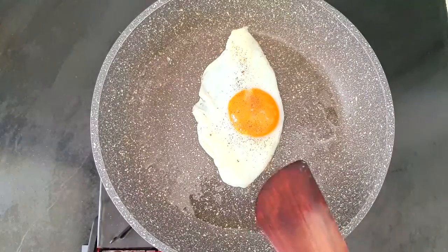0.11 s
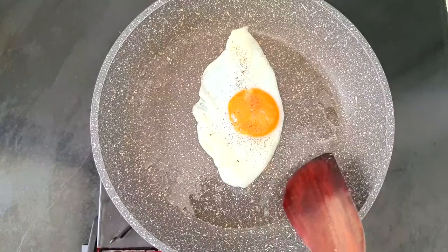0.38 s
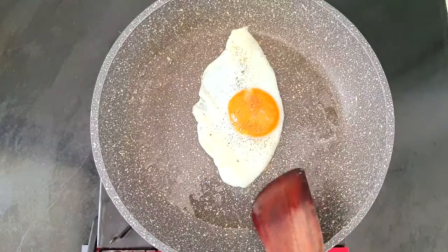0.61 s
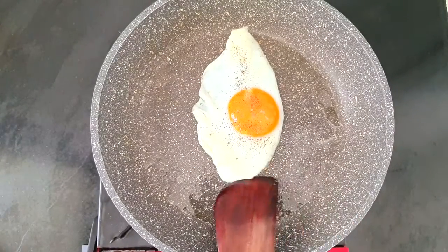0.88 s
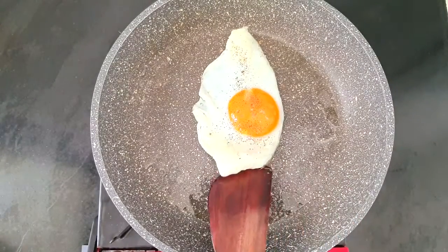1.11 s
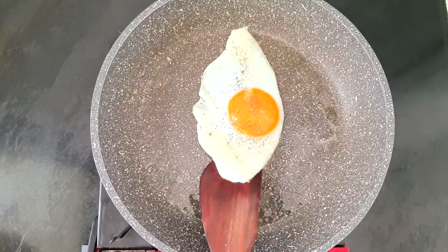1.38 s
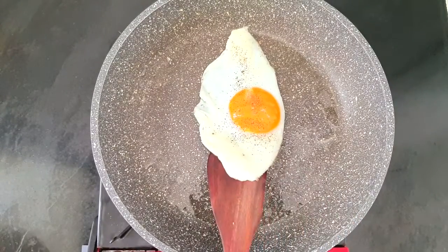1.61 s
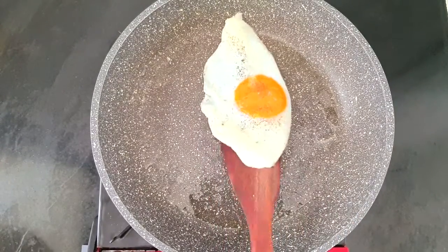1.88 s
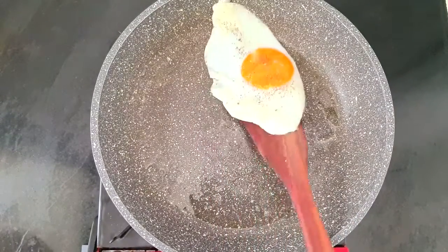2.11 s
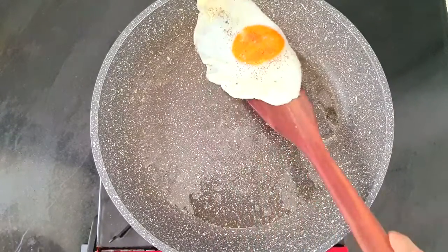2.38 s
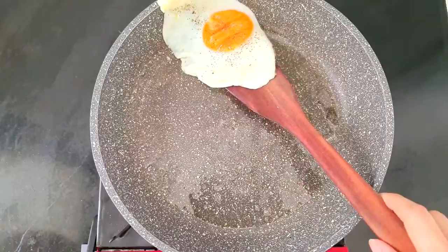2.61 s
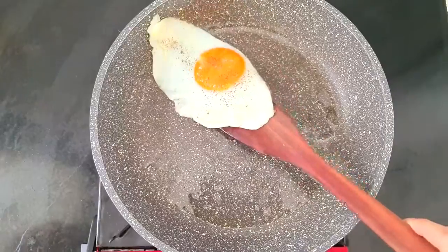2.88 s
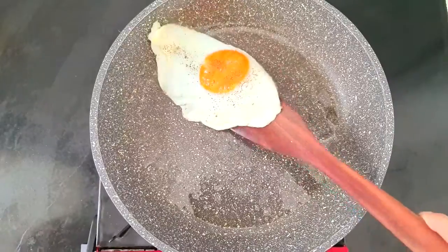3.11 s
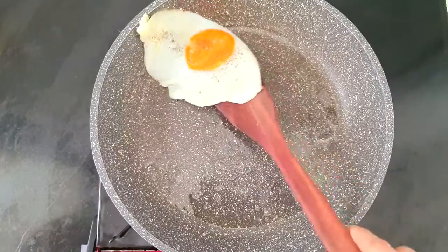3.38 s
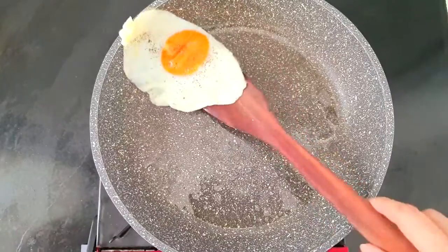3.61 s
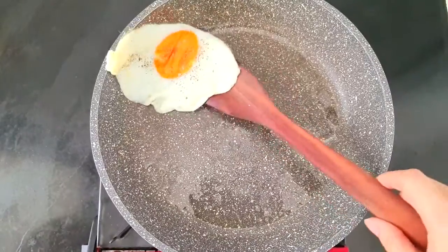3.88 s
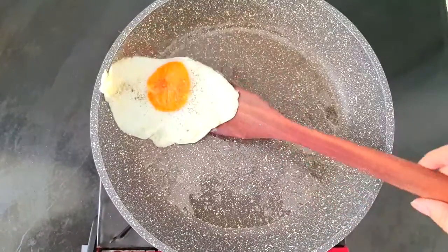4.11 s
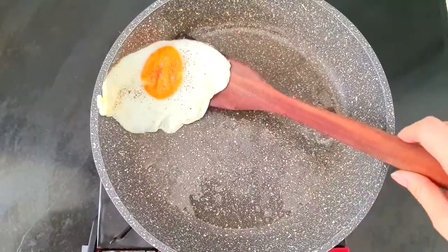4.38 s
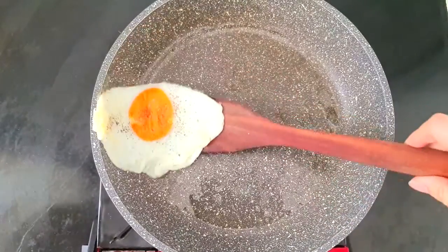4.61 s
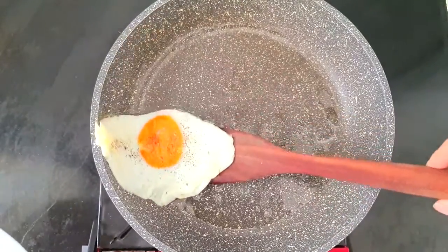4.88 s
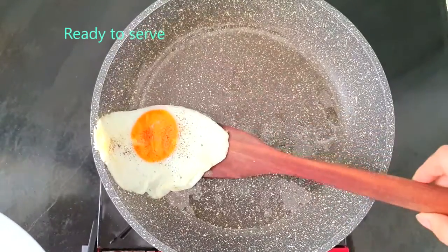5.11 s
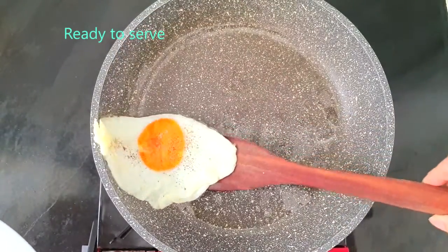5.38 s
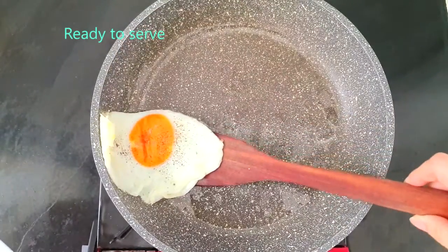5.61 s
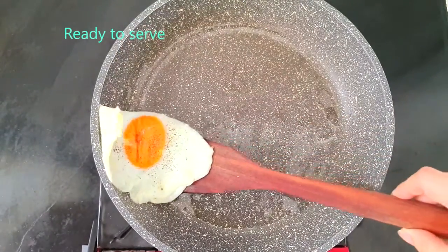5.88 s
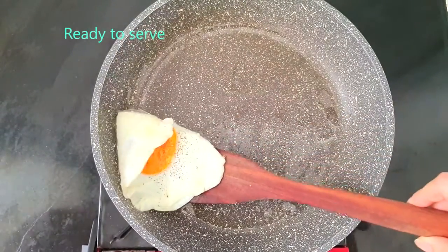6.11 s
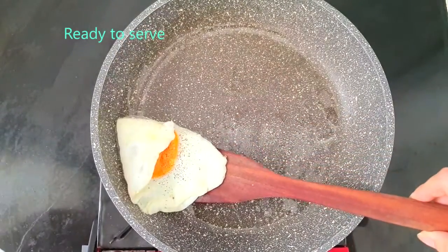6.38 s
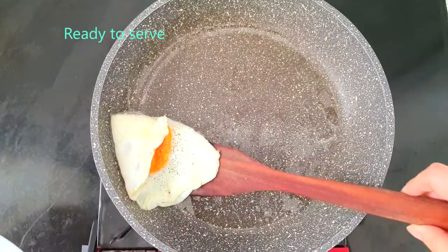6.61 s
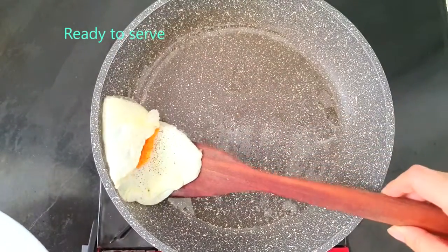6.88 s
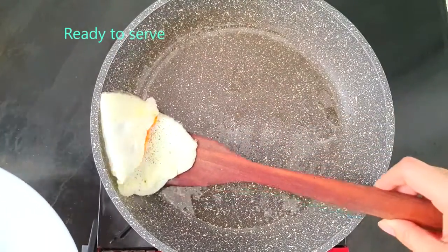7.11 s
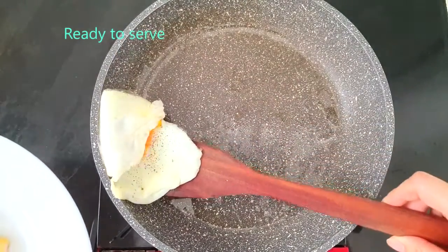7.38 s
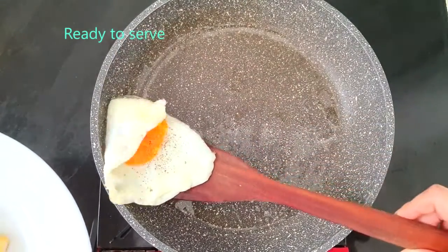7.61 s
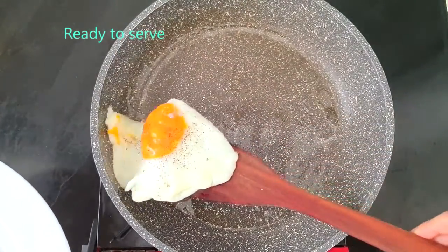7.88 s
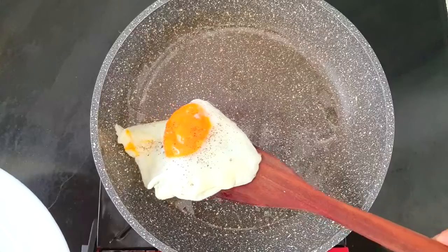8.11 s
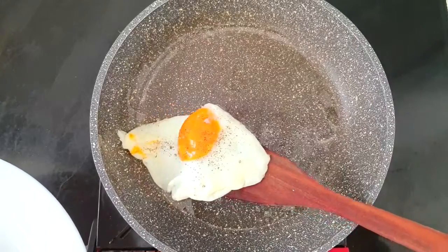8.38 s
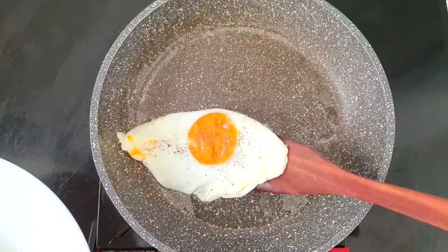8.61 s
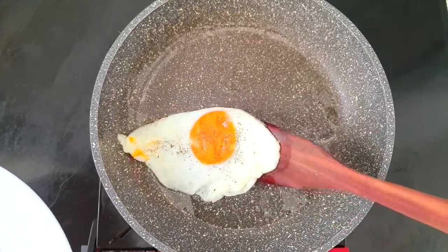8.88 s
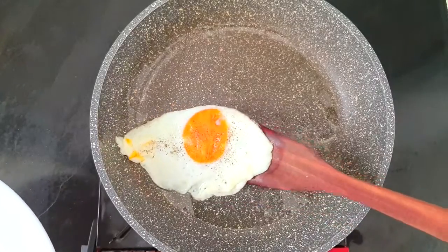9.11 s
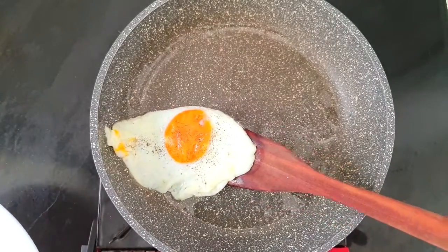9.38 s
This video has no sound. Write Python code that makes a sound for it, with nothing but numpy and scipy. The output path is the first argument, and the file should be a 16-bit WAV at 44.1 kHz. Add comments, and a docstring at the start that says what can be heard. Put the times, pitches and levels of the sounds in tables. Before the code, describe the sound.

Wood rasps and taps on a rough pan above faint gas hiss and fat crackle, a deep boom shudders, then a sharp final clack.

```python
"""Wooden spatula in a pan

A wooden spatula slides over the rough coating of a metal pan on a gas stove: random bumps shake the
pan's modes, and knocks and sharp ticks ring it. Low tones of the worktop waver under everything and
swell after a heavy thump nearby, which is a burst of noise. The burner is hissing noise with thin
whistling tones; fat crackles in small grains and puffs of noise. A hard kitchen answers with fading
noise; two microphones sit close above."""
import sys
import numpy as np
from scipy import signal
from scipy.fft import rfft, irfft, next_fast_len
from scipy.io import wavfile
from scipy.ndimage import uniform_filter1d, map_coordinates

SR = 44100
rng = np.random.default_rng(int(sys.argv[2]) if len(sys.argv) > 2 else 0)


def natural_amplitude(level_db):
    """Convert a level in decibels to a linear amplitude factor, elementwise."""
    exponent = np.asarray(level_db, float) / 20
    return 10 ** exponent


def transcribe(u):
    """Save the signal u as a 16-bit wav file named by the first command-line argument.

    u: samples, shape (n,) or (channels, n), limited to [-1, 1]; the rate is SR.
    q: integer samples, one column per channel.
    """
    v = np.clip(np.atleast_2d(u).T, -1, 1)
    q = np.round(v * 32767).astype(np.int16)
    wavfile.write(sys.argv[1], SR, q)


N = 418950
THUMP_S = 4.606  # moment of the heavy thump

# Modes of the metal pan. Each row: pitch in Hz, width in Hz, level in dB.
PAN_MODES = [(260, 29, -3), (303, 13.6, 1.5), (377.4, 65, 4), (495, 67, 8.5), (592.4, 52, 7),
             (720, 23.7, 5.5), (811.5, 28, 6.5), (967, 17, 2), (1042, 38, -6.5), (1228, 98, -8),
             (1413, 30, -2.5), (1648, 85, -4.5), (2470, 500, -19)]
# Wood knocking the pan. Each row: start in seconds, level in dB, hardness in dB,
# pitch in Hz that this spot rings most.
KNOCK_EVENTS = [(0.651, -34, -15, 546), (1.181, -62, 0, 740), (1.279, -44.5, -17, 576),
                (2.286, -30, -11, 824), (2.556, -36.5, -25, 550), (2.621, -36.5, -6, 480),
                (2.943, -51, -4, 900), (2.958, -28, -9.5, 700), (3.034, -37, -24, 780),
                (4.225, -44, -19, 870), (5.455, -38.5, -15.5, 603), (5.714, -41.5, -12, 590),
                (6.572, -43, -33, 390), (6.893, -39, -13, 554), (7.147, -39.5, -21, 420),
                (7.519, -33, -10.5, 495), (8.303, -46, -18, 684), (8.608, -26, -15, 567)]
# Level of the hissing bands near 3 kHz and above over time. Each row: time in seconds, level in dB.
BAND_LEVEL = [(0, -105), (.45, -88), (.84, -64.5), (2.4, -60), (3.3, -58), (4.0, -58.5), (5.0, -60),
              (6.0, -64.5), (6.85, -59), (7.25, -83), (7.9, -75), (8.6, -100), (8.75, -57.5), (8.97, -63.5),
              (9.5, -62.5)]
# How alike spread-out sound is at the two microphones. Each row: pitch in Hz, likeness from 0 to 1.
LIKENESS = [(100, 0.27), (600, 0.47), (1400, 0.0079), (3000, 0.003)]


def unit(x):
    """Scaled to rms 1."""
    return x / np.sqrt(np.mean(x ** 2) + 1e-20)


def along(points, hz):
    """Values at hz, read between (Hz, value) points on a log axis."""
    f, v = np.transpose(points)
    return np.interp(np.log(hz + 1), np.log(f + 1), v)


def curves(rows):
    """One value per sample for each column after the time column."""
    s, *cols = np.transpose(rows)
    t = np.arange(N) / SR
    return [np.interp(t, s, c) for c in cols]


def wobble(rate):
    """A smooth random curve with rate random points a second."""
    points = rng.standard_normal(int(N * rate / SR) + 4)
    return map_coordinates(points, [np.arange(N) * rate / SR])


def swell(start, rise, hold, fall_db_per_s):
    """Gain that rises, holds and dies away; times in seconds."""
    t = np.arange(N) / SR - start
    return np.clip(t / rise, 0, 1) * natural_amplitude(-fall_db_per_s * np.clip(t - rise - hold, 0, 2))


def filtered(x, response):
    """x passed through a complex response of frequency."""
    m = next_fast_len(N + SR // 2)
    return irfft(rfft(x, m) * response(np.fft.rfftfreq(m, 1 / SR)), m)[..., :N]


def resonances(modes):
    """Response of a set of ringing modes (Hz, width in Hz, dB), with signs that alternate."""
    def response(f):
        total = 0
        for k, (centre, width, db) in enumerate(modes):
            damping = 1j * f * width
            total = total + (-1) ** k * natural_amplitude(db) * damping / (centre * centre - f * f + damping)
        return total
    return response


def diffuse(gain, patchy_db):
    """Spread-out stereo noise with patches of random gain; its middle has rms 1."""
    z = signal.stft(rng.standard_normal((2, N)), nperseg=512)[2]
    field = uniform_filter1d(rng.standard_normal(z.shape[1:]), 6, 0)
    field = uniform_filter1d(field, 14, 1)
    pair = signal.istft(z * natural_amplitude(patchy_db * unit(field)), nperseg=512)[1][:, :N]

    def share(hz):
        angle = np.arccos(np.clip(along(LIKENESS, hz), -1, 1)) / 2
        return gain(hz) * [np.cos(angle), np.sin(angle)]

    mid, side = filtered(pair, share)
    return np.array([mid + side, mid - side]) / np.sqrt(np.mean(mid ** 2))


def tone(hz):
    """Phase of a tone that follows the pitch hz, from a random start."""
    return 2 * np.pi * (np.cumsum(hz) / SR + rng.random())


def grains(rate, spread_db):
    """Sparse random impulses in clumps, such as bumps of the coating passing under the edge."""
    passing = rng.random(N) < rate / SR * natural_amplitude(3 * wobble(40))
    sizes = natural_amplitude(spread_db * np.minimum(rng.exponential(size=N), 3))
    return passing * rng.standard_normal(N) * sizes


def wooden(f):
    """Soft wood excites little above its top frequency."""
    top_hz = 1800
    return 1 / (1 + 1.1j * f / top_hz - (f / top_hz) ** 2) ** 2


def stroke():
    """Force of the blade on the coating: rounded pushes, and a skid after every knock."""
    # Pushes of the blade. Each row: middle in seconds, half length in seconds, level in dB.
    push_rows = [(1.376, 0.36, -31), (1.818, 0.059, -17), (2.057, 0.086, -19.5), (2.582, 0.07, -34),
                 (3.25, 0.24, -19.5), (3.69, 0.041, -18), (3.993, 0.31, -29), (4.268, 0.055, -16.5),
                 (4.5, 0.3, -27), (5.504, 0.053, -29), (5.966, 0.67, -38), (6.725, 0.1, -21.5),
                 (7.202, 1, -36.5), (9.17, 0.051, -36)]
    skid_db, skid_rise_s, skid_fall_db_per_s = 12, 0.0042, 78  # level is over the knock
    t = np.arange(N) / SR
    power = np.zeros(N)
    for s, half, db in push_rows:
        power += natural_amplitude(2 * db) * np.exp(-4 * ((t - s) / half) ** 2)
    for s, db, *_ in KNOCK_EVENTS:
        power += (natural_amplitude(db + skid_db) * swell(s, skid_rise_s, 0, skid_fall_db_per_s)) ** 2
    return np.sqrt(power)


def scrape():
    """The bumps shake the pan's modes; short narrow tones of filtered noise ring along with them."""
    # Short narrow ringing tones, during the scrape or after a knock or the thump. Each row: start in
    # seconds, length in seconds, pitch in Hz, level in dB.
    ringing_rows = [(0.926, 0.34, 1684, -60), (1.425, .05, 1600, -56), (1.17, 0.62, 746, -58),
                    (2.475, .17, 3060, -58), (2.51, .085, 2620, -54), (3.43, 0.37, 483, -48),
                    (3.69, .075, 1400, -54), (3.86, .065, 1620, -55), (4.225, .11, 1630, -54),
                    (4.8, .32, 1370, -57), (5.723, 0.85, 1420, -69), (8.297, 0.085, 725, -51),
                    (8.38, .17, 780, -64), (8.605, 0.08, 1645, -46), (8.64, .25, 1640, -62),
                    (8.9, .16, 800, -66), (9.14, 0.16, 796, -59)]
    force = stroke() * grains(1200, spread_db=-5.0)
    out = filtered(force, lambda f: resonances(PAN_MODES)(f) * wooden(f))
    t = np.arange(N) / SR
    for s, length, hz, db in ringing_rows:
        done = np.clip((t - s) / length, 0, 1)
        fade = np.abs(np.sin(np.pi * done)) ** 0.36 * natural_amplitude(-6 * done)
        narrow = filtered(rng.standard_normal(N), lambda f: resonances([(hz, 65, 0)])(f) ** 2)
        out += natural_amplitude(db) * fade * unit(narrow)
    return out


def rasps():
    """Dense grit swells and fades around a centre pitch, in narrow streaks and up the treble; it shakes the pan."""
    # Short rasps of the edge over the coating. Each row: middle in seconds, rough length in seconds,
    # level in dB, centre in Hz.
    rasp_rows = [(0.743, 0.23, -56.5, 3200), (1.088, 0.093, -60.5, 3840), (1.18, 0.03, -51, 2960),
                 (1.315, 0.087, -54.5, 3830), (1.427, 0.038, -53.5, 3600), (1.812, 0.082, -49, 3170),
                 (2.039, 0.1, -54.5, 3100), (2.28, 0.19, -54, 3500), (2.532, 0.28, -53, 2840),
                 (2.672, 0.044, -46, 2660), (3.129, 0.12, -52, 2630), (3.217, 0.097, -45, 2510),
                 (3.361, 0.089, -49, 2820), (3.416, 0.057, -48.5, 3130), (3.603, 0.36, -53, 2620),
                 (3.663, 0.093, -53, 3360), (3.778, 0.056, -49, 2400), (3.87, 0.063, -51, 2780),
                 (4.079, 0.18, -52, 2660), (4.27, 0.15, -55, 3270), (5.024, 0.12, -51, 2950),
                 (5.42, 0.1, -50, 2930), (5.542, 0.04, -52, 2830), (5.625, 0.031, -55.5, 2700),
                 (6.714, 0.14, -51.5, 2870), (9.205, 0.13, -63.5, 2630)]
    # Treble of the coating under the edge: one row of pitch in Hz, width in Hz, level in dB.
    grit_treble = (15000, 120000, -16)
    # Shape of each narrow streak: width in Hz, level in dB.
    streak_shape = (110, -2)
    grit = unit(grains(1500, spread_db=1.5))
    out, force = np.zeros(N), np.zeros(N)
    for (s, length, db, hz), chance in zip(rasp_rows, rng.random((len(rasp_rows), 3))):
        n = round(length * 1.12 * SR)  # the fades included
        modes = [(hz, .16 * hz, 0), (1.55 * hz, .6 * hz, -6), grit_treble]
        modes += [(hz * (.8 + .5 * c), *streak_shape) for c in chance]
        colour = resonances(modes)(np.fft.rfftfreq(n, 1 / SR))
        first = round(s * SR) - n // 2
        part = slice(first, first + n)
        envelope = natural_amplitude(db) * np.hanning(n)
        out[part] += envelope * unit(irfft(rfft(grit[part]) * colour, n))
        force[part] += envelope * grit[part]
    return out + natural_amplitude(12.5) * filtered(force, resonances(PAN_MODES))


def knocks():
    """Each knock slaps dully and rings the modes near its spot most; a harder one reaches the upper modes."""
    thud_db, thud_t60_s = -2.5, 0.04  # dull slap of the wood: level over the knock, time to fall 60 dB
    t = np.arange(SR // 4) / SR
    hz, width, db = np.transpose(PAN_MODES)[:, :, None]
    rings, slaps = np.zeros(N + SR), np.zeros(N + SR)
    chances = rng.standard_normal((len(KNOCK_EVENTS), len(PAN_MODES), 1))
    for (s, level_db, hard_db, spot_hz), chance in zip(KNOCK_EVENTS, chances):
        near_db = -17 * np.abs(np.log2(hz / spot_hz))  # 17 dB less for each octave away
        strength = natural_amplitude(db + 2 * chance + np.where(hz > 1000, hard_db + 11.0, near_db))
        ring = 0.64 * strength * np.exp(-np.pi * 1.3 * width * t) * np.sin(2 * np.pi * hz * t)
        rings[round(s * SR):][:len(t)] += natural_amplitude(level_db) * ring.sum(0) * (1 - np.exp(-t / 0.00094))
        slap_db = level_db + thud_db + 1.0 * hard_db - 60 * t / thud_t60_s
        slaps[round(s * SR):][:len(t)] += natural_amplitude(slap_db) * (1 - np.exp(-t / 0.0019))
    slap = filtered(slaps[:N] * rng.standard_normal(N), resonances([(970, 1260, 19.8)]))
    return filtered(rings[:N] + slap, wooden)


def ticks():
    """A brief ping at the centre pitch and a wide crack of noise, as two rows."""
    # Sharp ticks of fat and of the spatula's edge. Each row: start in seconds, level in dB, centre in Hz.
    tick_rows = [(0.65, -39.5, 3000), (1.0057, -40.5, 5050), (1.1817, -40, 3320), (1.4217, -36.5, 3740),
                 (1.442, -41, 3930), (2.959, -36, 2720), (2.439, -50, 3160), (2.522, -45, 2580),
                 (2.65, -36, 2380), (3.161, -41, 2630), (3.195, -38, 2520), (3.3714, -37, 4000),
                 (3.4076, -36.5, 2680), (3.5428, -26, 3130), (3.699, -36, 4500), (4.062, -38, 3000),
                 (6.204, -41, 13000), (6.958, -46.5, 3500), (7.96, -31, 7700), (8.572, -43, 6100),
                 (8.6073, -11.5, 4660)]
    t = np.arange(SR // 40) / SR
    f = np.fft.rfftfreq(len(t), 1 / SR)
    out = np.zeros((2, N + SR))
    for (s, level_db, hz), noise in zip(tick_rows, rng.standard_normal((len(tick_rows), len(t)))):
        ping = 0.75 * np.sin(2 * np.pi * hz * t) * natural_amplitude(-60 * t / .016) * (1 - np.exp(-t / .0004))
        body_colour = resonances([(.55 * hz, .7 * hz, 0)])(f) / (1 + (0.46 * hz / (f + 1)) ** 4)
        body = unit(irfft(rfft(noise) * body_colour, len(t)))
        above = irfft(rfft(noise) / (1 + (0.95 * hz / (f + 1)) ** 4), len(t))
        snap = 0.043 * np.diff(noise, prepend=0) * natural_amplitude(-60 * t / 0.0095)
        crack = snap + (0.63 * above + 0.54 * body) * natural_amplitude(-60 * t / 0.022)
        out[:, round(s * SR):][:, :len(t)] += natural_amplitude(level_db) * np.array([ping, crack])
    return out[:, :N]


def rush():
    """The thump's wide burst of noise, spread by the room, with rough surges; treble comes and dies first."""
    # Colour of the burst's body. Each row: pitch in Hz, level in dB per Hz.
    thump_colour = [(120, -29), (200, -11), (497, -7.5), (800, -13), (1410, -8), (2350, -14.5), (6000, -36),
                    (7800, -66), (13200, -120)]
    # Rough surges on top of the burst. Each row: start in seconds, body level in dB, treble level in dB.
    surge_rows = [(4.626, -39, -53), (4.692, -53, -52), (4.735, -59, -62), (5.03, -71, -78)]
    # Modes that only the thump wakes. Each row: pitch in Hz, width in Hz, level in dB.
    rattle_modes = [(135, 12.7, -3), (176, 20, -16), (248, 14.6, -8)]
    low = diffuse(lambda hz: natural_amplitude(along(thump_colour, hz)), patchy_db=.5)
    treble_modes = [(3500, 1150, 9.5), (6540, 3300, 8.5), (13700, 2200, -16.0)]
    high = diffuse(resonances(treble_modes), patchy_db=-0.5)

    surge_power = np.zeros((2, N))
    for s, body_db, treble_db in surge_rows:
        shape = swell(s, rise=0.0054, hold=0.0043, fall_db_per_s=186)
        surge_power += (natural_amplitude([[body_db], [treble_db]]) * shape) ** 2
    body_surge, treble_surge = np.sqrt(surge_power)

    # the square root halves the fall to 54.5 dB a second
    body = natural_amplitude(-37) * np.sqrt(swell(THUMP_S, rise=0.018, hold=0.096, fall_db_per_s=2 * 54.5))
    body *= swell(THUMP_S, rise=1 / SR, hold=0.55, fall_db_per_s=105)  # then the burst breaks off
    treble = natural_amplitude(-40) * swell(THUMP_S, rise=0.0022, hold=0.072, fall_db_per_s=69)

    ringing = unit(filtered(rng.standard_normal(N), lambda f: resonances(rattle_modes)(f) ** 2))
    rattle = natural_amplitude(-34) * swell(4.685, rise=0.021, hold=0.026, fall_db_per_s=45) * ringing
    burst = np.hypot(body, body_surge) * low + np.hypot(treble, treble_surge) * high
    return rattle + natural_amplitude(.7 * wobble(60)) * burst


def boom():
    """Low modes fed unevenly, so that size and pitch flutter; the lowest is nearer the right microphone."""
    # Swells of the low tones; the three loudest are the shudders of the thump. Each row: start in
    # seconds, hold in seconds, level of the lowest tone in dB, level of the upper tones in dB.
    swell_rows = [(-.05, 0.073, -39, -38), (0.222, 0.18, -42, -42), (0.63, 0.49, -43.5, -47),
                  (1.531, 0.087, -35, -42.5), (1.82, 0.047, -42.5, -44), (2.327, 0.032, -62, -37),
                  (2.588, .06, -56, -45), (2.684, 0.059, -61, -34), (2.929, 0.25, -66, -35.5),
                  (3.23, 0.13, -37, -40.5), (3.613, 0.049, -44, -37.5), (4.212, 0.5, -105, -40),
                  (4.671, 0.063, -13.5, -19.5), (4.872, 0.16, -16, -26.5), (5.216, 0.1, -26.5, -41),
                  (5.602, 0.043, -45, -46), (6.633, 0.28, -38.5, -42.5), (7.067, 0.19, -48, -45.5),
                  (7.356, 0.1, -63, -45.5), (7.543, 0.53, -41.5, -48), (7.985, 0.86, -48.5, -46.5),
                  (8.61, 0.047, -32, -33), (8.813, 0.084, -38, -49), (9.036, 0.6, -43, -50.5)]
    # Low modes above the lowest tone. Each row: pitch in Hz, width in Hz, level in dB.
    upper_modes = [(78.2, 5.43, 5), (88.2, 6.5, 6), (103, 15.2, -5), (137.9, 6.9, -13.5), (66.5, 2.1, 1.5)]
    rest_low_db, rest_upper_db = -62, -54.5  # between swells
    lowest_hz, shaken_hz = 56.4, 48.2  # after the thump the lowest tone sags and stays down a while
    sag_s, shaken_s = 0.166, 1.4
    lean_db, shaken_lean_db = 7.5, 3.5  # the left loses this much of the lowest tone, the right gains half

    power = natural_amplitude([[rest_low_db], [rest_upper_db]]) ** 2 * np.ones((2, N))
    for s, hold, low_db, upper_db in swell_rows:
        shape = swell(s, rise=0.022, hold=hold, fall_db_per_s=109)
        power += (natural_amplitude([[low_db], [upper_db]]) * shape) ** 2
    low_gain, upper_gain = np.sqrt(power)

    since = np.arange(N) / SR - THUMP_S
    sag = (since > 0) * (since < shaken_s) * (1 - np.exp(-np.abs(since) / sag_s))
    hz = lowest_hz + (shaken_hz - lowest_hz) * sag
    flutter = natural_amplitude(2 * wobble(11))
    low = low_gain * flutter * np.sin(tone(hz + 2.98 * wobble(12)))
    lean = np.where(sag > 0, shaken_lean_db, lean_db) * [[-1], [.5]]

    upper_noise = rng.standard_normal(N)
    upper = unit(filtered(upper_noise, lambda f: resonances(upper_modes)(f) * (f > 62) * (f < 210)))
    return low * natural_amplitude(lean) + upper_gain * upper * natural_amplitude([[-.7], [.7]])


def burner():
    """Wide hiss, hissing bands near 3 kHz and above whose level rises and falls, and thin whistles."""
    # Thin whistle of the burner. Each row: time in seconds, pitch in Hz, relative level in dB.
    whistle_rows = [(0, 5950, -78), (.64, 6000, -77), (.7, 6000, -110), (7.05, 5250, -110),
                    (7.12, 5300, -73), (7.3, 5530, -74), (7.6, 5760, -74), (7.85, 5880, -74),
                    (8.58, 6050, -76), (8.7, 6050, -110)]
    # A second, higher whistle near the start. Each row: time in seconds, pitch in Hz, level in dB.
    piping_rows = [(.4, 8770, -110), (.47, 8770, -75), (.9, 8760, -73), (1.0, 8760, -110)]
    # The hissing bands near 3 kHz and above. Each row: pitch in Hz, width in Hz, level in dB.
    band_modes = [(3094, 59, 5), (3223, 2.9, 14.5), (3397, 98, 1.5), (8530, 116, -5.5), (10770, 1500, -9),
                  (13300, 260, -6.5)]
    # Colour of the wide hiss. Each row: pitch in Hz, level in dB per Hz.
    hiss_colour = [(1180, -5), (2000, -7), (2650, -5.5), (3160, -2.5), (4420, 0.5), (11000, -7),
                   (12300, -1.5), (13300, -14), (15700, -1.5)]
    band_db, = curves(BAND_LEVEL)
    hiss_db = -61.5 + 0.15 * (band_db - band_db.mean())  # the wide hiss swings less than the bands
    hiss = natural_amplitude(hiss_db + wobble(6.3)) * diffuse(lambda hz: natural_amplitude(along(hiss_colour, hz)), patchy_db=1.3)
    bands = natural_amplitude(band_db + wobble(11)) * diffuse(resonances(band_modes), patchy_db=-1.0)

    hz, db = curves(whistle_rows)
    phase = tone(hz + 26 * wobble(90))
    whistle = np.sqrt(2) * np.sin(phase) + .6 * np.sin(2 * phase)  # with its octave
    whistle = natural_amplitude(db - 2.5 + 3.5 * wobble(14)) * whistle
    piping_hz, piping_db = curves(piping_rows)
    piping = np.sqrt(2) * np.sin(tone(piping_hz + 8 * wobble(60)))
    piping = natural_amplitude(piping_db + wobble(20)) * piping
    return hiss + bands + piping + whistle


def sizzle():
    """Sparse tiny crackles of fat, rising and falling with the hissing bands; each side wavers on its own."""
    band_db, = curves(BAND_LEVEL)
    treble = lambda f: resonances([(9000, 9000, 0)])(f) ** 2
    crackles = unit(filtered(grains(300, spread_db=1.5), treble))
    waver_db = 6.9 * np.array([wobble(26), wobble(30)])
    return natural_amplitude(-77.5 + band_db - band_db.mean() + waver_db) * crackles


def spits():
    """Faint spits of fat: short puffs of treble noise."""
    # Each row: middle in seconds, length at half height in seconds, level in dB, centre in Hz.
    spit_rows = [(0.395, 0.033, -62, 12500), (7.307, .02, -61, 11500), (7.68, .015, -61, 7160),
                 (7.714, 0.046, -62, 11600), (7.84, 0.018, -62, 10500), (7.92, 0.022, -57, 12500),
                 (8.158, 0.073, -67, 11500), (8.52, 0.035, -65, 10000)]
    out = np.zeros((2, N))
    for s, length, db, hz in spit_rows:
        n = round(2 * length * SR)
        colour = resonances([(hz, .35 * hz, 0)])(np.fft.rfftfreq(n, 1 / SR)) ** 2
        puff = unit(irfft(rfft(rng.standard_normal((2, n))) * colour, n))
        out[:, round(s * SR) - n // 2:][:, :n] += natural_amplitude(db) * np.hanning(n) * puff
    return out


def room_tone():
    """Steady background of the kitchen: spread-out noise, mostly low, that wavers a little."""
    # Colour of the background. Each row: pitch in Hz, level in dB per Hz.
    room_colour = [(65, -17), (110, -9.5), (226, -30.5), (264, -21), (321, -31.5), (617, -51.5),
                   (2500, -81), (3250, -72), (5500, -120)]
    noise = diffuse(lambda hz: natural_amplitude(along(room_colour, hz)), patchy_db=2.5)
    return natural_amplitude(-54 + 1.9 * wobble(12)) * noise


def kitchen(x):
    """Each frequency of the room's answer dies at its own speed; the tail differs from moment to moment."""
    # How long the room rings. Each row: pitch in Hz, time to fall by 60 dB in seconds.
    decay_times = [(200, 0.58), (1000, 0.38), (4000, 0.71), (12000, 0.23)]
    out, step = np.zeros((2, N + 2 * SR)), SR // 3
    for start in range(0, N, step):
        hz, t, z = signal.stft(rng.standard_normal((2, SR * 3 // 4)), SR, nperseg=256)
        # long waves reach both microphones more alike
        angle = np.arccos(np.clip(along(LIKENESS, hz), -1, 1))[:, None] / 2
        z = np.cos(angle) * z[0] + np.sin(angle) * z[1] * [[[1]], [[-1]]]
        fading = natural_amplitude(-60 * t / along(decay_times, hz)[:, None])
        tail = signal.istft(z * fading, SR, nperseg=256)[1]
        tail = tail / np.linalg.norm(tail[0])
        answer = signal.fftconvolve(x[None, start:start + step], tail, axes=1)
        first = start + 200  # the answer comes 200 samples late
        out[:, first:first + answer.shape[1]] += answer
    return out[:, :N]


def spaced(x, lag):
    """The left microphone hears a near source lag samples after the right; a negative lag means before."""
    sides = np.array([[1], [-1]])
    return filtered(x, lambda hz: np.exp(-1j * np.pi * hz * lag / SR * sides))


def scene():
    """Pan sounds with their room, the thump, the burner and fat, over the steady kitchen."""
    rub = scrape() + rasps()
    blows = knocks()
    ping, crack = ticks()
    room = kitchen(natural_amplitude(-4.5) * rub + natural_amplitude(-1) * blows + natural_amplitude(-17) * ping + natural_amplitude(-10.5) * crack)
    direct = spaced(rub + blows, -2.0) + spaced(ping + crack, -2.5)
    air = direct + room + rush() + burner() + sizzle() + spits() + room_tone()
    return air * natural_amplitude([[-2.1], [1.7]]) + boom()  # left and right balance in dB


def low_pass(x):
    """Removes everything above the highest recorded frequency."""
    return signal.sosfilt(signal.butter(12, 16980, fs=SR, output="sos"), x)


def record(dry):
    """The recorder's band limit: nothing from 15870 Hz up passes."""
    mix = filtered(dry, lambda hz: hz < 15870)
    return low_pass(mix)


dry = scene()
out = record(dry)
transcribe(out)
```